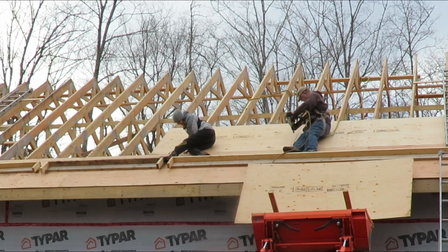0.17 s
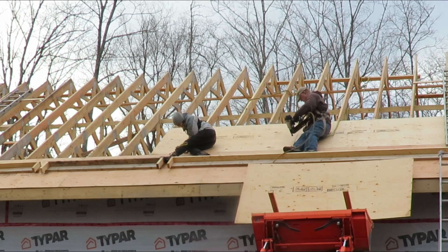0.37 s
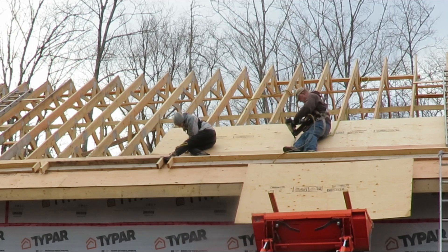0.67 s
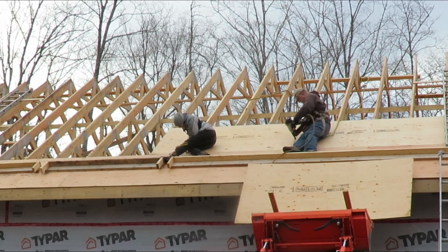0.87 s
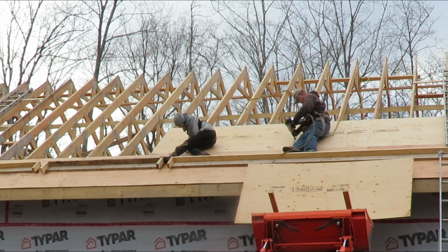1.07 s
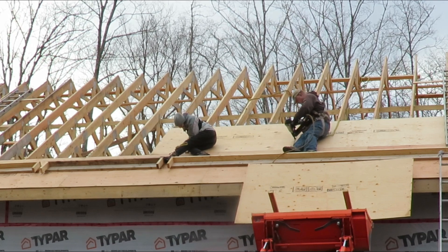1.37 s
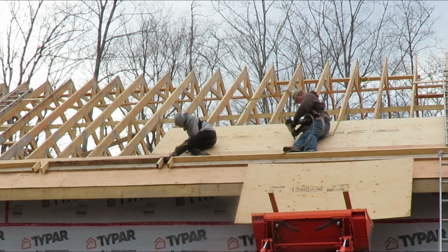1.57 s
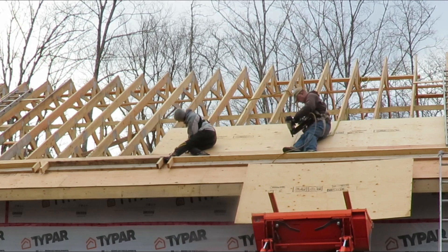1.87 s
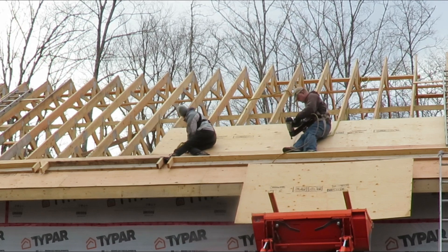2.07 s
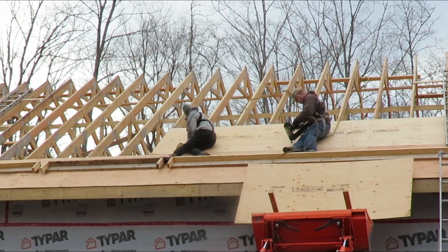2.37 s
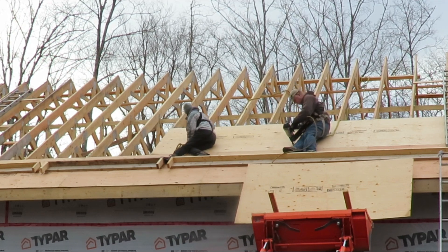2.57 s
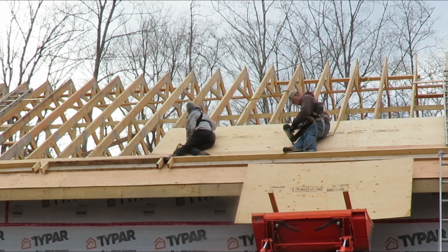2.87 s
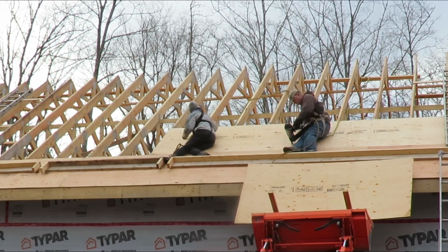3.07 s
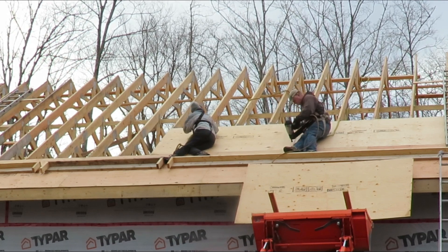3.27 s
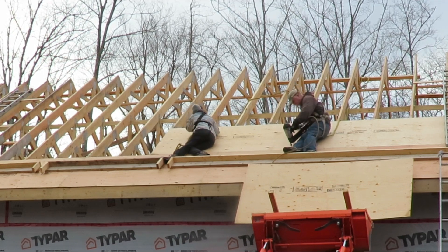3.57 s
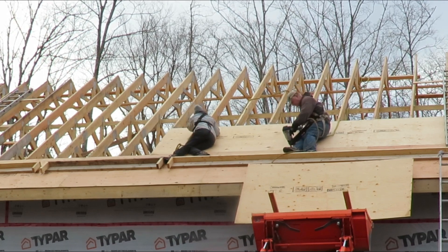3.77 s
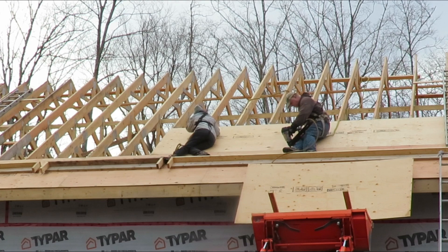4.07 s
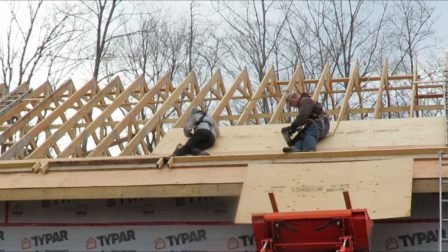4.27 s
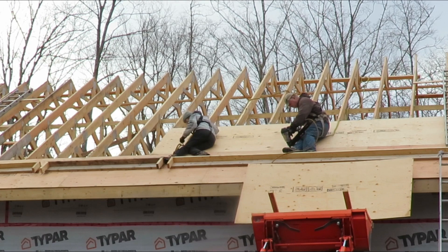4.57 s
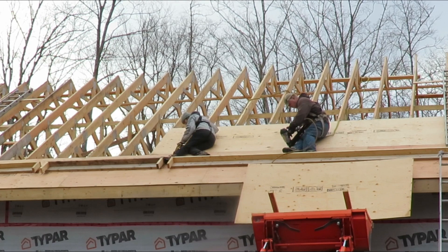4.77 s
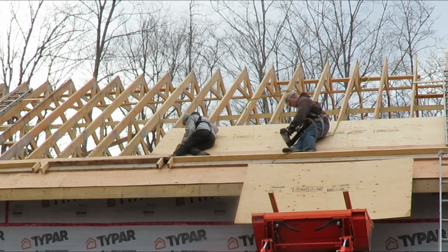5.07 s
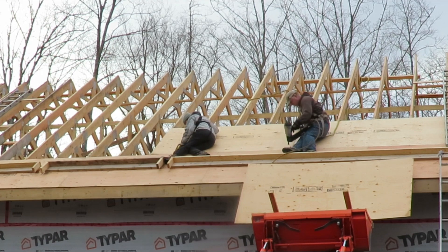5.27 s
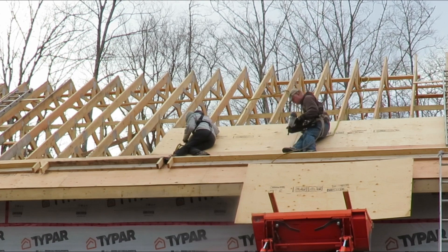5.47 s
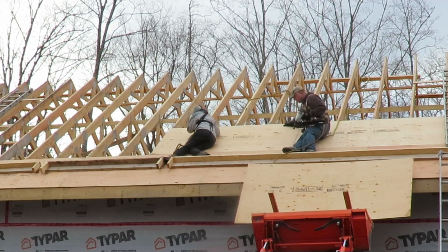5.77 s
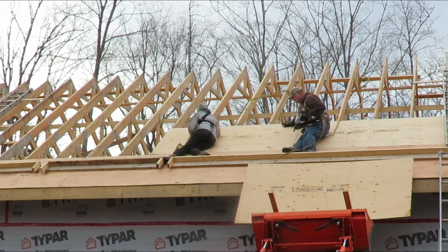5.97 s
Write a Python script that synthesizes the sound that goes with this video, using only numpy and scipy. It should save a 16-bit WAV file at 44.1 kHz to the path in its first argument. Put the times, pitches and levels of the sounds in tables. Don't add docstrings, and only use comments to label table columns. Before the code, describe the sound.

Three sharp nail-gun shots crack into plywood outdoors, each with an air puff and woodland echo, between tool clinks, scrapes and a faint distant engine.

```python
import sys
import numpy as np
from scipy import signal
from scipy.io import wavfile
from scipy.ndimage import uniform_filter1d

SR = 44100
rng = np.random.default_rng(int(sys.argv[2]) if len(sys.argv) > 2 else 0)


def voltage_ratio(decibels):
    exponent = np.asarray(decibels, float) / 20
    return 10 ** exponent


def master_out(mix):
    frames = np.transpose(np.atleast_2d(mix))
    ceiling = np.clip(frames, -1, 1)
    pcm = np.round(ceiling * 32767).astype(np.int16)
    wavfile.write(sys.argv[1], SR, pcm)


N = 270333
TIME = np.arange(N) / SR


# start_s, blow_db, pressure_db, recorder_gain_after_db
SHOTS = [
    (-.0195, 0, 4, -8),
    (1.6807, 2.5, -0.5, -9.5),
    (3.092, 0, -8, -12),
    (5.1505, 1.5, -9, -11.5),
]


def after(delay_s, db, slope=1.0, column=1):
    return [(row[0] + delay_s, db + slope * row[column]) for row in SHOTS]


# pitch_hz, level_db, t60_s
HEAD = [(1380, -1, .014), (800, -14, .02), (2700, -12, .008), (3800, -16, .006), (4900, -12, .007),
        (5800, -16, .007), (8500, -22, .005), (11500, -25, .005)]


def valve_knock():
    lead_s, level_db = .0088, -5
    return strike(after(-lead_s, level_db, 1.2)[1:], HEAD, chatter_db=-12.5, chatter_t60=0.044, sign=-1.4)


# pitch_hz, level_db, t60_s
PANEL = [(269, -3.5, 0.019), (517, -14.5, 0.065), (3500, -20, 0.0057), (8300, -20.5, 0.0045),
         (10050, -17.5, 0.005)]
# pitch_hz, level_db, t60_s
SHEET = [(894, -1, 0.026), (1090, -2, 0.027), (1530, -10.5, 0.057), (2500, -13, .01)]


def nail_blow():
    drive_s = .0009
    push = strike(after(-drive_s, 0)[1:], PANEL, chatter_db=-9.0, chatter_t60=0.0074)
    return push + strike(after(0, 0)[1:], SHEET, chatter_db=-11, chatter_t60=.045)


# delay_s, level_db
BUMPER = [
    (.0043, -2.5),
    (.0066, -1),
    (.0115, -9.5),
]
# pitch_hz, level_db, t60_s
CYLINDER = [(1240, -20.5, 0.066), (1803, -7, 0.025), (2080, -5, 0.011), (2566, -9.5, 0.015),
            (3190, -9.5, 0.014), (3630, -12.5, 0.019), (4050, -7, 0.0067), (5240, -13, 0.016),
            (6650, -28.5, .008), (8100, -30, 0.0027), (11000, -31.5, .005)]


def piston_on_bumper():
    hits = []
    for delay_s, db in BUMPER:
        hits += after(delay_s, db)[1:]
    return strike(hits, CYLINDER, chatter_db=-12, chatter_t60=0.006)


# pitch_hz, level_db, t60_s
STOP = [(1274, -13.5, 0.031), (1820, -0.5, 0.011), (2310, -8.5, 0.03), (3220, -15.5, .008),
        (4100, -31.5, 0.006)]


def piston_return():
    delay_s, level_db, pressure_slope, top_hz = .0605, -14.5, 0.44, 4527
    knocks = after(delay_s, level_db, pressure_slope, column=2)
    return low_pass(strike(knocks, STOP, chatter_db=-6.5, chatter_t60=.04), top_hz)


# pitch_hz, level_db (per Hz)
EXHAUST = [(1200, -4.5), (2500, 8), (5500, 6), (7500, -9), (9500, -1), (13000, -16), (16000, -15)]
# start_s, level_db
LATE_ECHOES = [(1.825, -36), (3.208, -39)]


def exhaust():
    puff_s, puff_t60_s, puff_db, pressure_slope = 0.046, 0.063, -27.5, 0.7
    spurt_s, spurt_db = 0.019, puff_db + 1.5
    trigger_lead_s, trigger_db = 0.011, -36.5
    whistle_hz, whistle_db = 11070, -82

    jet = rms_one(sum(voltage_ratio(at_hz(EXHAUST, hz)) * band for hz, band in bands(N, above_hz=640)))
    spurts = after(spurt_s, spurt_db, 1.0, column=2) + LATE_ECHOES
    spurts += after(-trigger_lead_s, trigger_db)[1:]
    puff = bursts(after(puff_s, puff_db, pressure_slope, column=2), puff_t60_s)
    flow = uniform_filter1d(puff + bursts(spurts, 0.048), size=300)
    flutter = voltage_ratio(1.1 * drift(90))

    leak = sum(np.exp(-((TIME - s - .3) / 0.043) ** 2) for s, *_ in SHOTS[1:])
    whistle = rms_one(narrow(rng.standard_normal(N), whistle_hz, 90))
    return jet * flow * flutter + voltage_ratio(whistle_db) * leak * whistle


def nailer():
    sheet_low_hz, top_hz = 216, 9800
    blows = valve_knock() + nail_blow() + piston_on_bumper() + piston_return()
    return high_pass(low_pass(blows, top_hz), sheet_low_hz, order=3) + exhaust()


# start_s, level_db (peak), pitch_hz, brightness_db, wood_db
CLINKS = [(0.9667, -38, 1930, -18, -10), (1.4186, -39.5, 1940, -21, -2), (1.5437, -22.5, 2100, -12.5, -8.5),
          (1.555, -17.5, 2080, -23, 3), (2.669, -30, 1980, -13.5, -9.5), (2.69, -36, 1780, -11, -2.5),
          (2.727, -41, 1780, -8.5, -7), (2.7644, -53, 1830, -2, -4), (2.795, -38.5, 1850, -12, -22.5),
          (2.9285, -24, 1640, -22, -12), (2.936, -27, 2230, -9.5, 0.5), (3.0437, -34.5, 2600, -10.5, -1),
          (4.7698, -35.5, 2080, -13, 3.5), (4.7975, -26.5, 1450, -15.5, -1)]


def clinks():
    t60_s, width_hz, wood_hz, wood_lasts = 0.044, 850, 750, 1.9
    age = np.arange(4000) / SR
    fade = voltage_ratio(-60 * age / t60_s)
    wood_fade = fade ** (1 / wood_lasts - 1)
    out = np.zeros(N)
    for s, db, hz, bright_db, wood_db in CLINKS:
        rattle = rng.standard_normal(len(age)) * fade * np.minimum(age / .001, 1)
        main = narrow(rattle, hz, width_hz)
        overtone = resonance(rattle, hz * 1.7, 600)
        wood = resonance(rattle * wood_fade, wood_hz, 1200)
        tick = low_pass(resonance(rattle * np.sqrt(fade), 4700, 2600), 5600)
        body = low_pass(3.43 * main + 1.4 * overtone + voltage_ratio(wood_db + 3.0) * wood, 4200)
        start = round(s * SR)
        out[start:start + len(age)] += voltage_ratio(db) * (body + voltage_ratio(bright_db + 9.0) * tick)
    return out


# pitch_hz, width_hz, level_db
RUB = [(523, 300, 5.5), (875, 1000, 4), (1470, 520, 6), (1760, 900, -3.5), (2930, 330, 1),
       (3500, 630, -5.5), (2530, 140, -12)]


def rubbed_sheet(grains, modes, top_hz):
    rung = sum(voltage_ratio(db) * (-1) ** k * resonance(grains, hz, w) for k, (hz, w, db) in enumerate(modes))
    return rms_one(low_pass(rung, top_hz))


# start_s, stop_s, start_level_db, stop_level_db, brightness_db
DRAGS = [
    (1.585, 1.65, -30.5, -36, -10),
    (2.936, 3.065, -46.5, -40, -5),
    (4.193, 4.471, -42.5, -32, 1),
    (4.509, 4.76, -45, -66.5, 4.5),
    (5.462, 5.70, -41.5, -34, 0.5),
    (5.747, 6.1, -61, -56, 5.5),
]
# start_s, level_db (peak), tool_ring_db
JOLTS = [(4.159, -38, -9), (4.249, -30, -20), (4.28, -28.5, -3), (4.333, -18, -8.5), (4.377, -17, -7),
         (4.394, -30.5, -12), (4.424, -16, -14), (4.448, -16.5, -15), (4.474, -32.5, -7.5),
         (5.555, -39, -18), (5.618, -41, -7), (5.681, -29, -8), (5.696, -43, 2)]


def drag():
    onset_db_s, release_db_s = 120.5, 260
    ring_db, hiss_db, hiss_follows = -7, -15.5, 0.36
    hose_s, hose_db, squeak_s, squeak_db = 5.72, -68.5, 6.0, -73

    sizes = voltage_ratio(5.6 * np.minimum(rng.exponential(1, N), 4))
    grains = sizes * rng.choice([-1, 1], N) * (rng.random(N) < 4000 / SR)
    dull = rubbed_sheet(grains, RUB[:4], 3500)
    keen = rubbed_sheet(grains, RUB[4:], 4500)
    dust = rms_one(grains) + 1.5 * rng.standard_normal(N)
    hiss = rms_one(low_pass(resonance(dust, 5000, 1900), 7500))

    jolts = bursts([(s, db) for s, db, _ in JOLTS], 0.046)
    tool_rings = bursts([(s, db + tool_db) for s, db, tool_db in JOLTS], 0.035)
    out = voltage_ratio(-12.5) * uniform_filter1d(jolts, size=350) * dull
    out += voltage_ratio(-2.5) * uniform_filter1d(tool_rings, size=200) * keen

    for start, stop, start_db, stop_db, bright_db in DRAGS:
        edges_db = onset_db_s * np.maximum(start - TIME, 0) + release_db_s * np.maximum(TIME - stop, 0)
        level_db = np.interp(TIME, [start, stop], [start_db, stop_db]) - np.minimum(edges_db, 150)
        level = voltage_ratio(level_db - 12 + 3.0 * drift(44))
        stroke_hiss = voltage_ratio(bright_db + hiss_db + hiss_follows * (level_db + 33)) * hiss
        out += level * (dull + voltage_ratio(bright_db + ring_db) * keen + stroke_hiss)

    out += voltage_ratio(hose_db) * np.clip((TIME - hose_s) / 0.057, 0, 1) * hiss
    squeak = rms_one(resonance(resonance(grains, 5430, 700), 4600, 700))
    return out + voltage_ratio(squeak_db) * np.clip((TIME - squeak_s) / 0.037, 0, 1) * squeak


# pitch_hz, level_db (per Hz)
TAIL = [(60, -17.5), (200, 12.5), (600, -1.5), (2000, 0.5), (4000, -9), (5800, -7), (8000, -16),
        (15000, -25.5)]
# pitch_hz, t60_s
TAIL_T60 = [(100, 0.26), (300, 0.41), (1000, 0.76), (2500, 0.83), (4200, 0.7), (6000, 0.46), (7500, 0.38),
            (12000, 0.2)]


def echo_pattern():
    near_db, near_t60_s, mid_db, far_db, far_t60_times = -20.5, 0.1, -36.5, -51.5, 2.5
    build_cycles, patchy_db = 21, 2
    age = TIME[:2 * SR]
    answer = np.zeros(len(age))
    for hz, band in bands(len(age)):
        t60_s = at_hz(TAIL_T60, hz)
        rafters = voltage_ratio(near_db - 60 * age / near_t60_s)
        trees = voltage_ratio(mid_db - 60 * age / t60_s) + voltage_ratio(far_db - 60 * age / t60_s / far_t60_times)
        clumps = voltage_ratio(at_hz(TAIL, hz) + patchy_db * drift(60, size=len(age)))
        build_up = np.minimum(age * hz / build_cycles, 1)
        answer += clumps * build_up * band * (rafters + trees)
    return answer


def site(rubbing):
    shot_db, pressure_slope, clink_db, rubbing_db = -7.5 + 26, .5, 5, -3
    lead = 2000
    sent = np.r_[np.zeros(lead), voltage_ratio(rubbing_db) * rubbing]
    for s, db in after(0, shot_db, pressure_slope, column=2):
        sent[lead + round(s * SR)] += voltage_ratio(db)
    for s, db, *_, wood_db in CLINKS:
        sent[lead + round(s * SR)] += voltage_ratio(db + wood_db + clink_db)
    return signal.fftconvolve(sent, echo_pattern())[lead:lead + N]


# pitch_hz, level_db (per Hz)
AIR = [(20, -22.5), (50, -1), (120, -6.5), (330, -2), (800, -5.5), (1700, -12.5), (3300, -24),
       (15600, -36.5)]


def site_air():
    return voltage_ratio(-47) * rms_one(sum(voltage_ratio(at_hz(AIR, hz) + .8 * drift(0.67)) * band for hz, band in bands(N)))


# pitch_hz, width_hz, level_db
HUM = [(59, 5.3, -54.5), (140, 6, -60), (299, 15, -55), (462, 30, -64), (833, 61, -55)]


def far_engine():
    out = np.zeros(N)
    for hz, width_hz, db in HUM:
        tone = rms_one(resonance(drone(hz, width_hz), hz, 2 * width_hz))
        out += voltage_ratio(db + 0.5 * drift(5.7)) * tone
    return out


def background():
    hold_s, recovery_db_s = 0.55, 9
    gain_db = np.zeros(N)
    for s, *_, after_db in SHOTS:
        since = TIME >= s
        recovered_db = recovery_db_s * np.maximum(TIME[since] - s - hold_s, 0)
        gain_db[since] = np.minimum(after_db + recovered_db, 0)
    return voltage_ratio(gain_db) * (site_air() + far_engine())


def strike(events, modes, chatter_db, chatter_t60, spread_db=1.5, sign=1):
    white_slope = np.diff(rng.standard_normal(N + 1))
    chatter = voltage_ratio(chatter_db) * bursts(events, chatter_t60) * white_slope
    scatter = rng.standard_normal((len(events), len(modes)))
    out = np.zeros(N)
    for k, (hz, db, t60) in enumerate(modes):
        force = chatter.copy()
        for (s, blow_db), chance in zip(events, scatter[:, k]):
            force[round(s * SR)] += sign * voltage_ratio(blow_db + spread_db * chance)
        out += voltage_ratio(db) * ring(force, hz, t60)
    return out


def bursts(events, t60):
    return sum(voltage_ratio(db - 60 * np.clip(TIME - s, 0, 9 * t60) / t60) * (TIME >= s) for s, db in events)


def ring(x, hz, t60):
    r, w = voltage_ratio(-60 / (t60 * SR)), 2 * np.pi * hz / SR
    return signal.lfilter([0, np.sin(w)], [1, -2 * r * np.cos(w), r * r], x + 1e-18)


def resonance(x, hz, width_hz):
    r, w = np.exp(-np.pi * width_hz / SR), 2 * np.pi * hz / SR
    return signal.lfilter(np.array([1, 0, -1]) * (1 - r * r) / 2, [1, -2 * r * np.cos(w), r * r], x)


def narrow(x, hz, width_hz):
    return resonance(resonance(x, hz, width_hz), hz, width_hz)


def low_pass(x, hz):
    return signal.sosfilt(signal.butter(2, hz, fs=SR, output="sos"), x)


def high_pass(x, hz, order):
    return signal.sosfilt(signal.butter(order, hz, "high", fs=SR, output="sos"), x)


def bands(size, above_hz=0):
    white = rng.standard_normal((2, size))
    edges = 22 * 2 ** np.arange(0, 9.7, 1 / 3)
    out = []
    for k, (low, high) in enumerate(zip(edges, edges[1:])):
        if low > above_hz:
            sos = signal.butter(2, [low, high], "band", fs=SR, output="sos")
            out.append((np.sqrt(low * high), signal.sosfilt(sos, white[k % 2])))
    return out


def drone(hz, width_hz):
    wander = np.sqrt(2 * np.pi * width_hz / SR) * rng.standard_normal(N)
    return rms_one(np.sin(np.cumsum(2 * np.pi * hz / SR + wander)))


def drift(rate, size=N):
    knots = rng.standard_normal(400)
    return np.interp(TIME[:size] * rate, np.arange(len(knots)), knots)


def at_hz(points, hz):
    pitch_hz, values = np.transpose(points)
    return np.interp(np.log(hz), np.log(pitch_hz), values)


def rms_one(x):
    return x / np.sqrt(np.mean(x ** 2) + 1e-20)


def scene():
    rubbing = drag()
    return (nailer() + clinks() + rubbing + site(rubbing) + background())[None]


def top_cut(x):
    return signal.sosfilt(signal.butter(12, 15720, fs=SR, output="sos"), x)


def record(dry):
    ceiling, mic_low_hz = .99, 102
    clipped = dry / (1 + np.abs(dry / ceiling) ** 6) ** (1 / 6)
    return top_cut(high_pass(clipped, mic_low_hz, order=2))


dry = scene()
out = record(dry)
master_out(out)
```